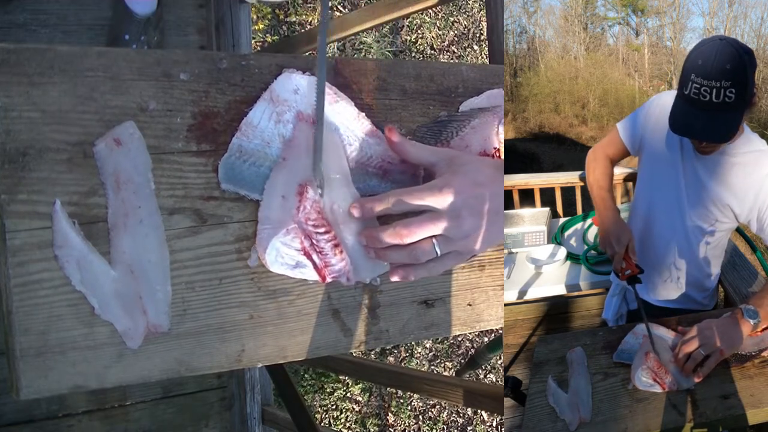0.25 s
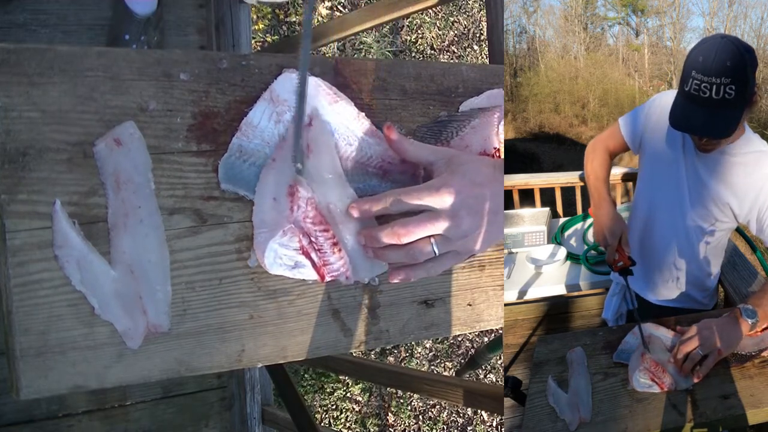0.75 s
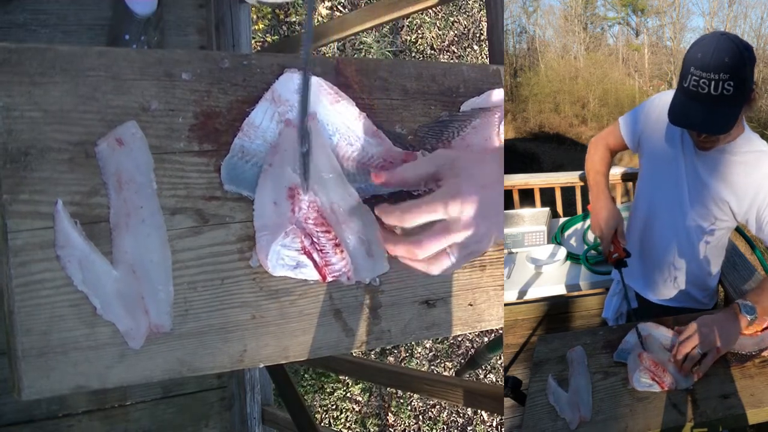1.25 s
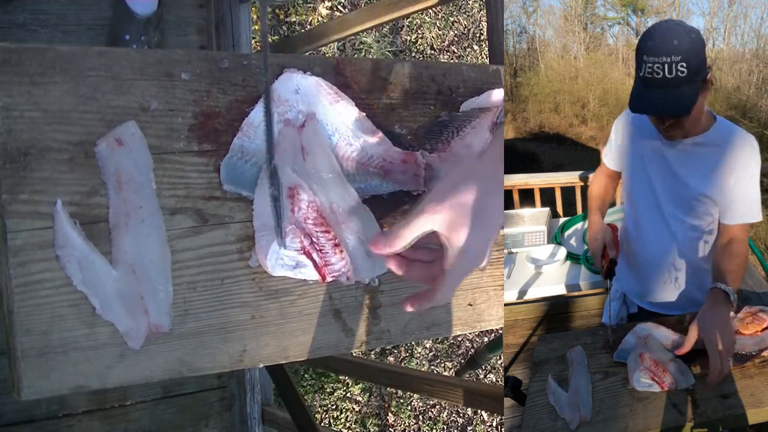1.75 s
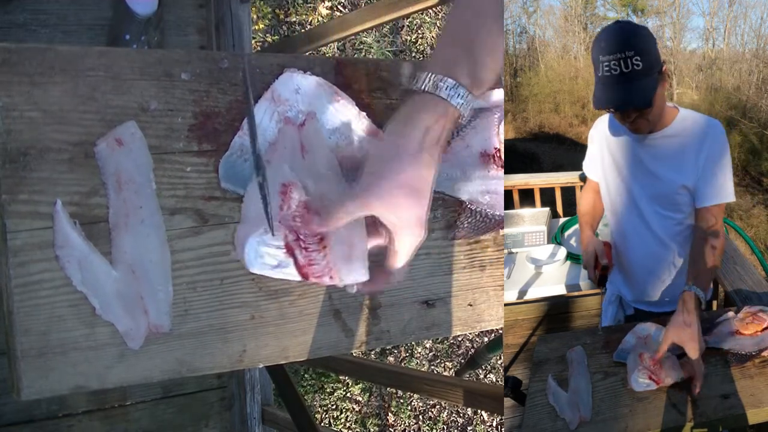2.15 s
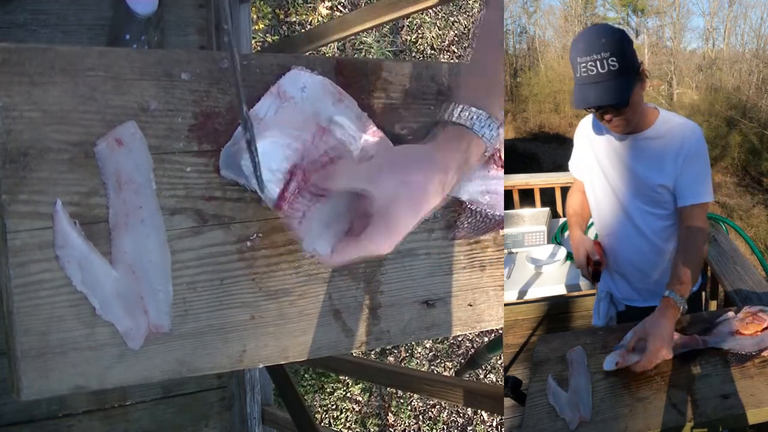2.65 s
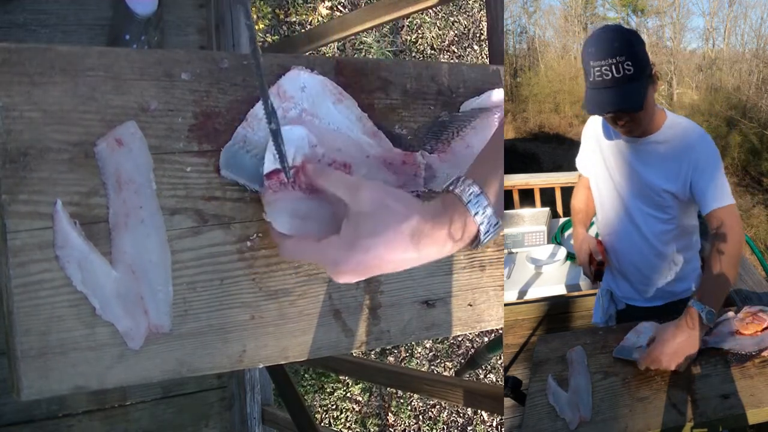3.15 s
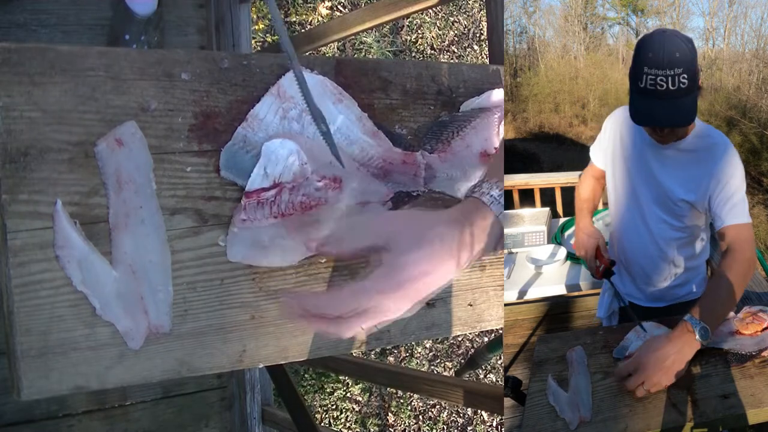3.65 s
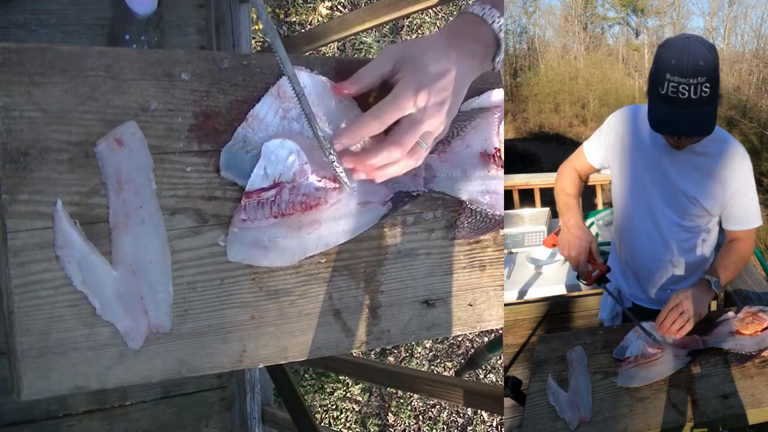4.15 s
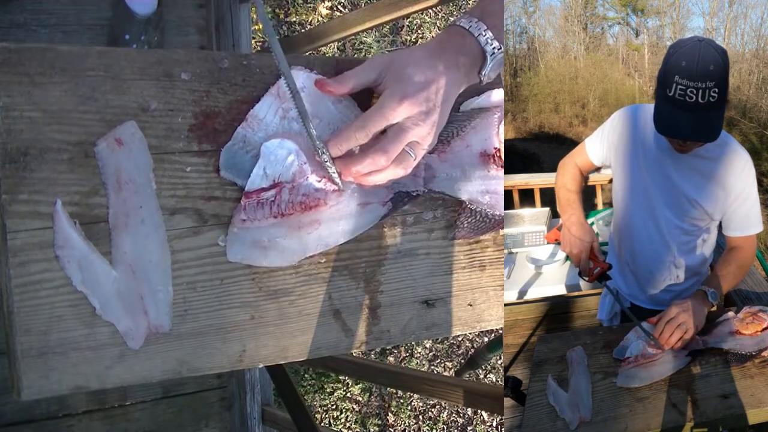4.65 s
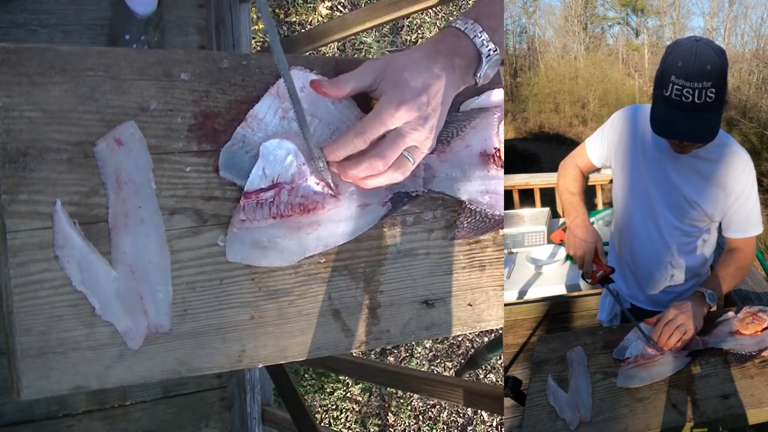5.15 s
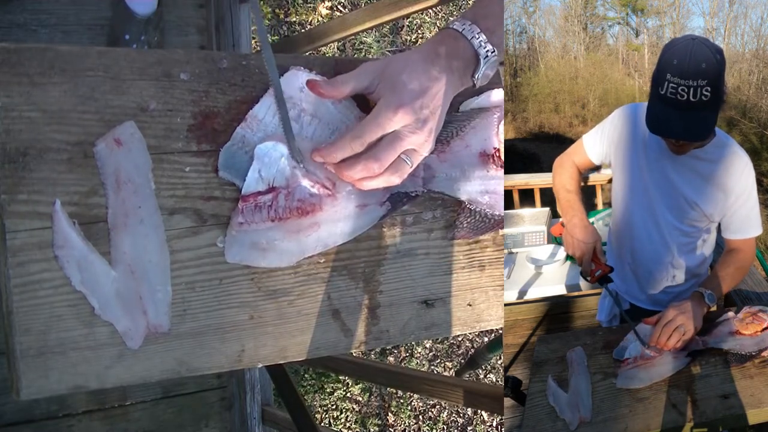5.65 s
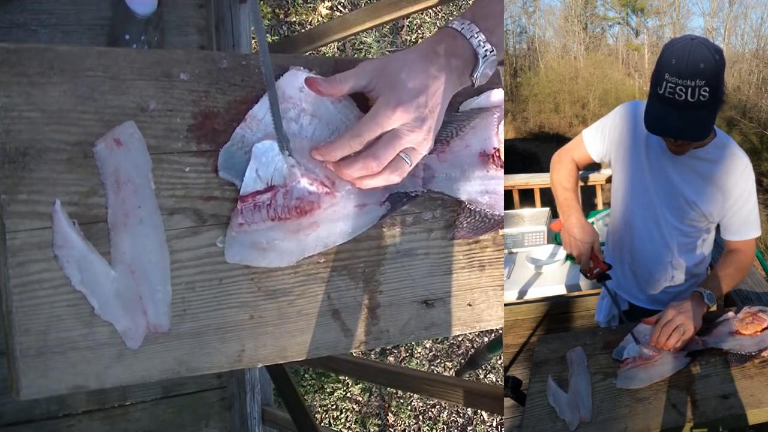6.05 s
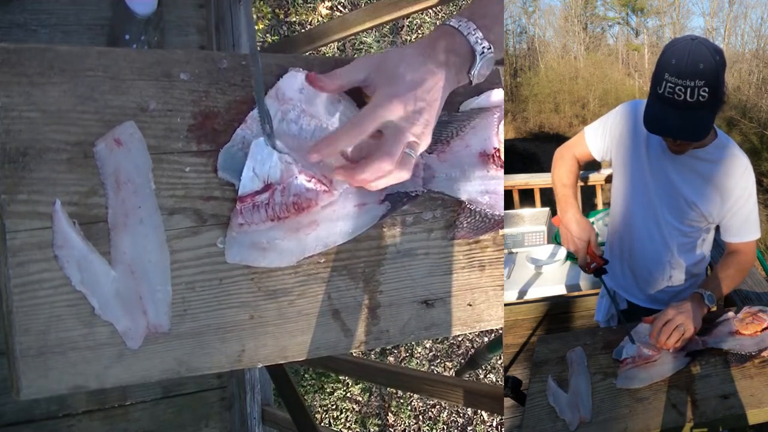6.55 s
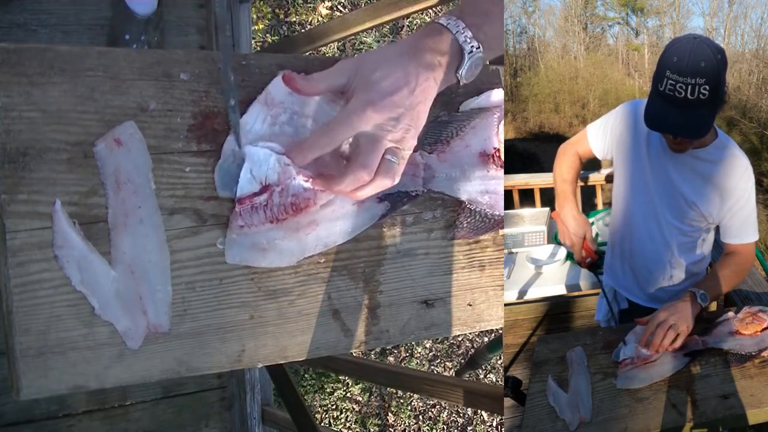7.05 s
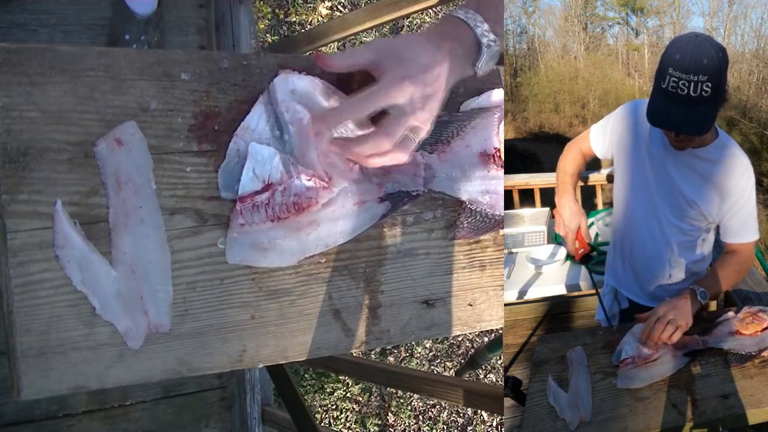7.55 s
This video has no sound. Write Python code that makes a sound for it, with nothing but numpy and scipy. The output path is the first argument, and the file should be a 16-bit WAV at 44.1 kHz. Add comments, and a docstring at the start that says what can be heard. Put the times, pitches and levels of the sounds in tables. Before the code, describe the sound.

A hard, rattling electric buzz with hissing, scraping twin blades works through fish flesh, briefly grating on bone. It slackens into loose metallic clacks that space out and die. Faint wet ticks fill a pause over far traffic and a passing engine's drone. The motor snaps on again, runs in a steadier buzz with small surges of hiss, then catches in coarse crunchy snags. Open air, close microphone, light wind buffets.

```python
"""An electric fillet knife saws through a fish on an outdoor table, coasts to a stop and starts again.
Its drive is a train of impact knocks ringing housing modes; its twin blades are timed noise bursts that
click and scrape, over a sliding hiss. Motor speed and hand pressure set the levels; coasting blades clack.
Behind it: low engine hum as modulated sines, and traffic rush and gusts at the microphone as shaped noise."""
import sys
import numpy as np
from scipy import signal
from scipy.fft import rfft, irfft, next_fast_len
from scipy.io import wavfile
from scipy.ndimage import uniform_filter1d, map_coordinates

SR = 44100
rng = np.random.default_rng(int(sys.argv[2]) if len(sys.argv) > 2 else 0)


def transcribe(u):
    """Save the signal u as a 16-bit wav file named by the first command-line argument.

    u: samples, shape (n,) or (channels, n), limited to [-1, 1]; the rate is SR.
    q: integer samples, one column per channel.
    """
    v = np.clip(np.atleast_2d(u).T, -1, 1)
    q = np.round(v * 32767).astype(np.int16)
    wavfile.write(sys.argv[1], SR, q)


N = 343980

# the motor runs, coasts to a stop and starts again: time_s, stroke_rate_hz
MOTOR_SPEED = [(0, 31.69), (0.48, 31.87), (0.88, 32.244), (1.19, 32.237), (1.95, 19.447), (2.83, 7.177),
               (3.05, 5.272), (3.3, 0.0), (5.125, 0.0), (5.22, 24.047), (5.36, 34.688), (5.7, 32.86),
               (6.65, 32.502), (7.15, 32.783), (7.4, 32.586), (7.52, 34.368), (7.8, 34.528)]
# the motor kicks as it starts: start_s, end_s, gain_db
INRUSH = [(5.16, 5.215, 4.5)]
# the drive runs slack and rattles out of step: start_s, end_s, scatter_strokes
SLACK_SPELLS = [(1.58, 3.3, 0.0075), (5.1, 5.3, 0.049), (7.41, 7.8, .11)]
# how hard the blades are pressed into the fish: time_s, pressure_0_to_1
PRESSURE = [(0, 0.46), (.48, 0.52), (.56, 0.6), (.63, 0.4), (.71, 0.98), (.89, 0.96), (.93, 0.43),
            (1.15, 0.42), (1.3, 0), (1.7, 0.22), (5.25, 0.01), (5.55, 0), (5.8, 0.31), (6.5, 0.33),
            (6.65, 0.63), (7.05, 0.35), (7.3, 0.69), (7.35, 0.7), (7.40, 0.47), (7.8, 0.6)]
# the hand's grip on the housing, which tightens in the second cut: time_s, firmness_0_to_1
FIRMNESS = [(5.7, 0.2), (6.05, 0.68), (6.4, 1), (7.26, 0.93), (7.36, .1), (7.8, 0.2)]

# backlash knocks, relative levels: place_strokes, first_cut_db, second_cut_db
KNOCKS = [(0.97, 0.5, -2), (.06, -9, -10), (.5, -6, -2.5), (.615, -6.5, -7), (.67, -10, -8)]
# housing modes in the first cut, then under a light and a firm hand: mode_hz, width_hz, relative_db
FIRST_GRIP = [(1590, 76, -11.5), (1857, 30, 2.5), (2560, 350, -13), (1920, 160, 4.5)]
LIGHT_GRIP = [(1594, 230, -2), (1840, 140, -1), (2000, 90, -3.5)]
FIRM_GRIP = [(1540, 114, -3.5), (1714, 83, 1), (1893, 115, -2), (2084, 46, -4), (2510, 170, -12.5)]
# modes of the housing's hollow: mode_hz, width_hz, relative_db
HOLLOW = [(567, 71, -2.5), (624, 59, 1)]
# modes of the chattering gears: mode_hz, width_hz, relative_db
GEARS = [(2100, 130, 4.5), (3280, 480, -8.5), (4200, 600, -9)]
# spectrum of the gear whirr: frequency_hz, relative_db
WHIRR = [(100, -21), (200, 1.5), (400, 0.5), (620, 1.5), (900, 2), (1300, 3), (2000, 2.5), (3000, -0.5),
         (4000, -3.5), (5500, -6), (9000, -69)]

# light ticks of the blade mounts: place_strokes, relative_db, decay_ms
TICKS = [(0.1, -2, 0.58), (0.515, 5, 0.5), (.57, 1, 0.34), (0.969, 6, 0.51)]
# spectra of the blades' scrape, hiss, and clicks in either cut: frequency_hz, relative_db
SCRAPE = [(800, -2.5), (2500, -0.5), (3500, 1), (5000, 2.5), (7000, 6.5), (8500, 8.5), (10000, 6.5),
          (12000, 1.5), (14000, -1), (16000, -10)]
HISS = [(2500, -7), (4500, -1), (6500, 4.5), (8000, 5), (10500, 7), (13500, -1.5), (16000, -12)]
FIRST_CLICK = [(800, -13), (2500, -12), (4800, -4.5), (6000, -4), (7200, 4.5), (8800, -4.5), (11000, 0.5),
               (13300, -3), (16000, -12)]
SECOND_CLICK = [(800, -13), (2500, -9), (4800, -4), (6200, -2), (7500, -6), (9600, 0), (11200, 0),
                (13600, 1.5), (16000, -12)]
# each push of the hand squeezes the blades and they hiss more: start_s, end_s, gain_db
PUSHES = [(.24, .52, 1), (1.15, 1.22, 3.5), (1.34, 1.48, 6), (5.91, 6.03, 4), (6.11, 6.25, 5.5),
          (6.32, 6.41, 4.5), (6.5, 6.61, 5), (6.74, 6.77, 1.5), (7.27, 7.46, 3), (7.54, 7.68, 3.5)]
# flexing mode of the steel blade, then teeth on bone: mode_hz, width_hz, relative_db
STEEL = [(5930, 400, 0)]
BONE = [(2530, 210, 0)]
# the steel rings where flesh does not damp it: start_s, end_s, place_strokes, strike_db
RINGS = [(1.773, 1.83, 0.6, -32.5), (5.586, 5.88, .33, -31)]
# the teeth cross the ribs: start_s, end_s, strike_db
RIB_CUTS = [(.59, 0.658, -44), (0.732, 0.9, -36.5), (1.348, 1.55, -41)]
# hard strikes between the coasting blades: time_s, relative_db, resonance_hz
CLACKS = [(1.474, -33, 10900), (1.5179, -35, 11000), (1.5559, -32, 7050), (1.5943, -30, 9200),
          (1.6337, -38, 5780), (1.6741, -31, 9680), (1.7164, -29.5, 4220), (1.7604, -34, 5800),
          (1.8056, -27, 9600), (1.8512, -36, 5900), (1.9001, -31, 10200), (1.9495, -31.5, 9750),
          (2.0022, -31.5, 8230), (2.0564, -34, 8300), (2.1151, -36, 10900), (2.174, -32.5, 9800),
          (2.2378, -38, 8320), (2.2757, -41, 4560), (2.3077, -44, 8840), (2.34, -37.5, 9830),
          (2.3765, -38, 6900), (2.415, -33.5, 10200), (2.4548, -56, 9350), (2.4952, -43, 5740),
          (2.503, -38, 3370), (2.5391, -46, 7250), (2.552, -47, 9800), (2.5958, -39.5, 3110),
          (2.635, -43, 7200), (2.6873, -43, 9900), (2.6984, -41, 3120), (2.724, -50, 7100),
          (2.7427, -41, 7200), (2.8195, -44, 4540), (2.8724, -44, 11100), (2.9692, -48.5, 6790),
          (3.04, -47.5, 5820), (3.0624, -51, 5510), (3.1243, -47, 7340)]
# snags of the teeth: time_s, relative_db, resonance_hz
SNAGS = [(5.1775, -40, 4400), (5.1965, -37, 6700), (5.272, -27, 6600), (5.3045, -30, 7400),
         (5.335, -33, 5100), (7.3994, -20.5, 10800), (7.4548, -23, 11000), (7.5064, -29, 2190),
         (7.5193, -22.5, 3180), (7.5485, -17.5, 11000), (7.58, -29, 8660), (7.621, -21.5, 10000),
         (7.6396, -24, 8370), (7.6648, -25, 10200), (7.6787, -20, 2280), (7.752, -27, 10700)]
# spectrum of the snags: frequency_hz, relative_db
SNAG_COLOUR = [(800, -4), (2200, -2), (4000, 1.5), (5500, 3), (8000, 4), (11000, 2), (16000, -12)]
# small ticks as the knife stops and the fish is turned, then the trigger: time_s, strike_db
HANDLING = [(3.1882, -52), (3.2044, -55), (3.29, -60), (3.4456, -62), (3.7055, -56), (3.7459, -57),
            (4.3864, -60), (5.1275, -49)]
# spectrum of the answer from table and rails: frequency_hz, relative_db
TABLE_ANSWER = [(600, -4.0), (2000, -5.5), (4000, -1.0)]

# spectra of the tyre rush, distant traffic and wind buffeting: frequency_hz, relative_db
TYRES = [(200, -12), (450, -4.5), (750, 1), (1100, -3), (1700, -21), (3000, -48)]
TRAFFIC = [(60, 2), (100, 2.5), (160, 1), (250, -1), (420, -4.5), (560, -2), (850, -2), (1250, -8),
           (1600, -15), (2000, -21), (3200, -37.5), (5000, -41.5), (11000, -42), (16000, -46)]
BUFFET = [(12, 5.5), (20, 8), (40, 5.5), (60, -2), (100, -13), (140, -24), (250, -36), (600, -110)]
# stereo width of the traffic and of the wind: frequency_hz, side_db
TRAFFIC_WIDTH = [(120, -28), (300, -19.5), (1000, -10.5), (2500, -0.5), (6000, 0.5)]
WIND_WIDTH = [(30, -5.5), (150, -15.5)]
# gusts, before each port's share is taken: time_s, half_width_s, rise_db
GUSTS = [(.13, 0.024, 13.5), (.3, 0.058, 11), (.87, 0.11, 13.5), (1.34, 0.072, 3.5), (1.74, 0.25, 9),
         (2.44, 0.059, 9.5), (7.5, 0.037, 12), (7.69, 0.096, 7.5)]
# eddies striking the microphone, before each port's gain: time_s, relative_db, half_width_ms
EDDIES = [(0.338, -21.5, 2.9), (0.851, -22, 8.6), (0.924, -19.5, 7.6), (1.259, -22.5, 9), (1.326, -26, 2.4),
          (2.405, -31, 2.9), (7.44, -26.5, 2.9), (7.523, -14, 9.3), (7.648, -20.5, 2.7)]

# pairs hold (first cut, second cut); a "fall" is in dB per tenfold slowing; "press" is added at full pressure
SECOND_CUT_S, TOP_HZ = 4, 16000
KNOCK_DB, KNOCK_FALL_DB, KNOCK_PRESS_DB, SLACK_KNOCK_DB = -47, 36, 1, -5.5
KNOCK_UNEVEN_DB, FIRM_DB = 1.5, 1.5  # a firm grip knocks louder
WHIRR_DB, WHIRR_FALL_DB, RATTLE_WHIRR_DB = -41.5, 39, 5  # the whirr is louder while the drive rattles
BOOM_DB, BOOM_PRESS_DB, BOOM_WAVER_DB = (-61, -55.5), 3, 1.5
STARTING_SHARE = 0.42  # under starting torque only this share of the drive's fall applies
# coasting below this stroke rate (Hz) the gears stop knocking and chatter
UNLOADED_SPEED_HZ, UNLOADED_DB, CHATTER_DB, CHATTER_FALL_DB = 26, -23, -48.5, 13

CLICK_DB, CLICK_PRESS_DB, CLICK_FALL_DB = (-43.5, -36), 21.5, 18
BACK_CLICK_DB, CLICK_UNEVEN_DB = (4.5, -10), 1.0  # gain of the return stroke's click
SCRAPE_DB, SCRAPE_PRESS_DB, SCRAPE_FALL_DB = (-35, -42.5), 4, 18
HISS_DB, HISS_FALL_DB = (-47, -48.5), 40
IN_FLESH_DB, SUNK_PRESSURE = 3.5, 0.64  # the hiss grows until the blades are sunk in
# coasting below this stroke rate (Hz) the blades part and scrape less
PART_SPEED_HZ, PARTED_SCRAPE_DB, PARTED_HISS_DB = 25.7, -11.5, -4
# turning points (place in the stroke 0-1); pressed blades meet earlier
OUT_PLACE, BACK_PLACE, PRESS_ADVANCE = .335, .77, 0.089
GLIDE_DB, GLIDE_PLACE = 1.5, 0.18  # swell of the hiss, twice a stroke
WAVER_DB, SLOW_WAVER_DB, COLOUR_DRIFT_DB = .9, 2, 1.5
SWELL_S, FADE_S, PUSH_EDGE_S = 0.063, 0.026, 0.0056  # edges of a ring or rasp, then of a push
CLACK_DB, CLACK_MS, SHIVER_DB, SHIVER_MS = -2.5, 2.4, -15, 33
SNAG_DB, SNAG_MS = -13, 13
STRIKE_RISE = 0.084  # rise time of a strike as a share of its decay
LOOSEN_S, RESEAT_S, SEATED_SCATTER = 0.027, .12, .001  # scatter in strokes
UNEVEN_LIMIT = 1.3  # standard deviations by which a contact's strength may stray
TABLE_LAG_MS, TABLE_ANSWER_DB, TABLE_DECAY_MS = 0.072, -9, 10

# a far engine passes: firing rate, when it is nearest, how long it stays near
ENGINE_HZ, NEAREST_S, PASS_S, ENGINE_DB, TYRES_DB = 70.94, 1.74, 0.9, -38, -50
LATE_HUM_HZ, LATE_HUM_S, LATE_HUM_RISE_S, LATE_HUM_DB = 136.6, 6.55, 0.24, -48.5
TRAFFIC_DB, TRAFFIC_EBB_DB_PER_S, BREEZE_DB = -43.5, 0.34, -37.5


def drive():
    """Impact excitation of resonators: backlash rings the housing, friction booms and whirrs, the rotor sings."""
    speed, firm, press = curve(MOTOR_SPEED), curve(FIRMNESS), curve(PRESSURE)
    turns = np.cumsum(speed) / SR
    slow = slowing(33.9) * per_cut(1.0, STARTING_SHARE)
    inrush_db = spells(INRUSH, 0.0097, 0.016)
    second = per_cut(False, True)

    blows = sum(contacts(place, KNOCK_UNEVEN_DB) * amp(per_cut(a, b)) for place, a, b in KNOCKS)
    blows = unit(blows + bursts(blows, decay_ms=26.0) * amp(-45.5))
    knock_db = KNOCK_DB + KNOCK_PRESS_DB * press - KNOCK_FALL_DB * slow + UNLOADED_DB * unloaded()
    # a slack drive knocks more softly
    knock_db = knock_db + SLACK_KNOCK_DB * np.clip(slack() / 0.008, 0, 1)
    blows = blows * amp(knock_db + inrush_db + FIRM_DB * firm)
    knocks = ringing(blows * ~second, FIRST_GRIP)
    knocks = knocks + ringing(blows * second * (1 - firm), LIGHT_GRIP)
    knocks = knocks + ringing(blows * firm, FIRM_GRIP)

    # friction peaks twice a stroke, once in each direction
    load = amp(2.65 * np.cos(4 * np.pi * (turns - .1)))
    whirr_db = WHIRR_DB + per_cut(-0.26, -1.63) - WHIRR_FALL_DB * slow + 0.19 * inrush_db
    whirr_db = whirr_db + RATTLE_WHIRR_DB * np.clip(slack() / 0.28, 0, 1)
    whirr = coloured(airy(scatter_db=-28.0) * load, WHIRR) * amp(whirr_db)

    boom_db = per_cut(*BOOM_DB) + BOOM_PRESS_DB * press - WHIRR_FALL_DB * slow
    boom_db = boom_db + BOOM_WAVER_DB * wobble(9)
    boom = ringing(rng.standard_normal(N) * load, HOLLOW) * amp(boom_db)

    # the rotor tone keeps 8.4 cycles to the stroke
    rotor = np.sin(2 * np.pi * 8.4 * turns + .6 * wobble(16)) * amp(2.5 * wobble(14))
    rotor = rotor * amp(-54.0) * (speed / speed.max()) ** 2
    return (knocks + whirr + boom) * running() * amp([[.6], [-.6]]) + rotor


def chatter():
    """Repeated impact: unloaded gears chatter five times a stroke as the motor runs down."""
    teeth = sum(contacts(k / 5, uneven_db=4) for k in range(5))
    level = amp(CHATTER_DB - CHATTER_FALL_DB * slowing(UNLOADED_SPEED_HZ)) * unloaded() * running()
    return ringing(bursts(teeth * level, decay_ms=2.0), GEARS)


def blades():
    """Impact and sliding friction: blades click at both turning points, scrape after the second, hiss sliding."""
    speed, press = curve(MOTOR_SPEED), curve(PRESSURE)
    pace, slow = speed / speed.max(), slowing(28.4)
    second = per_cut(False, True)
    parted = np.clip((PART_SPEED_HZ - speed) / 2, 0, 1)

    early = PRESS_ADVANCE * press
    outs = contacts(OUT_PLACE - early, CLICK_UNEVEN_DB)
    catches = contacts(BACK_PLACE - early, CLICK_UNEVEN_DB)
    click_db = per_cut(*CLICK_DB) + CLICK_PRESS_DB * press - CLICK_FALL_DB * slow
    meetings = outs + catches * amp(per_cut(*BACK_CLICK_DB))
    click = bursts(meetings * amp(click_db), decay_ms=0.89)
    click = coloured(click * ~second, FIRST_CLICK) + coloured(click * second, SECOND_CLICK)

    scrape_db = per_cut(*SCRAPE_DB) + SCRAPE_PRESS_DB * press ** 2 - SCRAPE_FALL_DB * slow
    scrape_db = scrape_db + PARTED_SCRAPE_DB * parted + WAVER_DB * wobble(8.8)
    scrape = bursts(catches * amp(scrape_db + 12.5 - 13.7 * pace), decay_ms=3.3)

    def during(start, end, db):
        """Gain envelope of one spell of contact."""
        return spells([(start, end, amp(db))], SWELL_S, FADE_S)

    taps = sum(contacts(place, CLICK_UNEVEN_DB) * during(start, end, db) for start, end, place, db in RINGS)
    ring = ringing(bursts(taps, decay_ms=0.77), STEEL)
    rib_blows = (catches + .5 * outs) * sum(during(*row) for row in RIB_CUTS)
    rasp = ringing(bursts(rib_blows, decay_ms=2.4), BONE)

    hiss_db = per_cut(*HISS_DB) + IN_FLESH_DB * np.clip(press / SUNK_PRESSURE, 0, 1)
    hiss_db = hiss_db - HISS_FALL_DB * slow * per_cut(0.85, 0.59)
    hiss_db = hiss_db + spells(PUSHES, PUSH_EDGE_S, PUSH_EDGE_S) + PARTED_HISS_DB * parted * ~second
    # the slower the blades slide, the more unevenly they rub
    hiss_db = hiss_db + (WAVER_DB + SLOW_WAVER_DB * (1 - pace)) * wobble(22)
    ticks = sum(bursts(contacts(place, uneven_db=5.5) * amp(db + 7.0), ms) for place, db, ms in TICKS)
    # the hiss swells just before each turning point and dips after it
    glide_db = GLIDE_DB * np.cos(4 * np.pi * (np.cumsum(speed) / SR - GLIDE_PLACE))
    slide = airy(scatter_db=8.0) * amp(glide_db + 4.0 * wobble(400))
    hiss = coloured((ticks * pace * (1 - parted) + slide) * amp(hiss_db) * np.sqrt(running()), HISS)

    rubbing = shifting(hiss + coloured(scrape, SCRAPE) * running() ** 3, COLOUR_DRIFT_DB)
    return (rubbing + (click + ring + rasp) * running() ** 3) * amp([[-.5], [.5]])


def clacks():
    """Impact and modal decay: coasting blades snap together and shiver, at a resonance given for each blow."""
    snap = strikes(CLACKS, CLACK_MS, width_hz=910, ring_db=4.5)
    shiver = strikes(CLACKS, SHIVER_MS, width_hz=560, ring_db=7)
    return amp(CLACK_DB) * coloured(snap + amp(SHIVER_DB) * shiver, SCRAPE)


def snags():
    """Catch and release: teeth snag and rasp as the blades bite into the cut and are drawn out of it."""
    return amp(SNAG_DB) * coloured(strikes(SNAGS, SNAG_MS, width_hz=950, ring_db=4.5), SNAG_COLOUR)


def handling():
    """Light impact with friction: ticks of knife, wet fish and trigger, each with a faint rustle after it."""
    s, db = np.transpose(HANDLING)
    taps = np.bincount((s * SR).astype(int), amp(db), N)
    rustle = amp(-16) * bursts(taps, decay_ms=48.0)
    return coloured(bursts(taps, decay_ms=3.5) + rustle, FIRST_CLICK)


def over_table(x):
    """Arrival delay and reflection: the right port leads; table and rails answer weakly, mostly in the treble."""
    ports = np.array([[-1], [1]])
    direct = filtered(x, lambda hz: np.exp(1j * np.pi * hz * TABLE_LAG_MS / 1000 * ports))
    t_ms = np.arange(SR // 20) * 1000 / SR
    tail = rng.standard_normal((2, len(t_ms))) * np.exp(-t_ms / TABLE_DECAY_MS)
    answer = signal.fftconvolve(x, tail / np.linalg.norm(tail[0]), axes=1)[:, :N]
    return direct + amp(TABLE_ANSWER_DB) * coloured(answer, TABLE_ANSWER)


def wind():
    """Turbulent pressure on the microphone: a breeze, its gusts and single eddies buffet the left port most."""
    t = np.arange(N) / SR
    gust_db = sum(db * np.exp(-((t - s) / width) ** 2 / 2) for s, width, db in GUSTS)
    flutter_db = 1.6 * wobble(9)
    buffet = spread(BUFFET, WIND_WIDTH) * amp(BREEZE_DB + flutter_db)
    # the right port is sheltered and feels only part of each gust
    buffet = buffet * amp(np.array([1.0 + gust_db, -1.5 + .5 * gust_db]))
    eddies = np.zeros(N)
    for s, db, half_width_ms in EDDIES:
        square = ((t - s) * 1000 / half_width_ms) ** 2
        eddies -= amp(db) * np.exp(-square / 2) * (1 - square / 2)
    return buffet + eddies * amp([[4], [-10]])


def distance():
    """Broadband and periodic sources far off: traffic, a passing engine with its tyres, and two faint hums."""
    t = np.arange(N) / SR
    traffic = spread(TRAFFIC, TRAFFIC_WIDTH)
    traffic = traffic * amp(TRAFFIC_DB - TRAFFIC_EBB_DB_PER_S * t + 0.44 * wobble(5.13))
    # sound pressure falls as one over the distance
    nearness = 1 / np.hypot(1, (t - NEAREST_S) / PASS_S)
    engine = np.sin(2 * np.pi * ENGINE_HZ * t + 1.45 * wobble(7))
    engine = nearness * amp(ENGINE_DB + 1.9 * wobble(8.4)) * engine
    tyres = nearness ** 2 * amp(TYRES_DB) * coloured(rng.standard_normal(N), TYRES)
    late = np.sin(2 * np.pi * LATE_HUM_HZ * t + 0.17 * wobble(4.3))
    late = amp(LATE_HUM_DB) * spells([(LATE_HUM_S, t[-1], 1)], LATE_HUM_RISE_S, 1) * late
    drone = amp(-58.5 + 2.1 * wobble(12)) * np.sin(2 * np.pi * 554 * t + 2.57 * wobble(24))
    return traffic + engine + tyres + late + drone


def running():
    """Onset of motion: 0 at rest, rising with speed to 1 at six strokes a second."""
    return np.clip(curve(MOTOR_SPEED) / 6, 0, 1)


def slowing(full_speed_hz):
    """Logarithmic speed scale: tenfold steps by which the motor is slower than full_speed_hz."""
    return -np.log10(np.clip(curve(MOTOR_SPEED) / full_speed_hz, 1e-3, 1))


def unloaded():
    """Torque release: rises from 0 to 0.9 as the motor of the first cut coasts and stops pushing the gears."""
    return per_cut(0.9, 0) * np.clip(UNLOADED_SPEED_HZ - curve(MOTOR_SPEED), 0, 1)


def slack():
    """Mechanical play: timing scatter of the contacts, in strokes."""
    return SEATED_SCATTER + spells(SLACK_SPELLS, LOOSEN_S, RESEAT_S)


def per_cut(first, second):
    """Change of grip: one value for each of the two cuts."""
    return np.where(np.arange(N) > SECOND_CUT_S * SR, second, first)


def contacts(place, uneven_db):
    """Cyclic impact: one impulse each time the crank passes a place in its stroke; the place may drift."""
    turns = np.cumsum(curve(MOTOR_SPEED)) / SR
    strokes = np.arange(int(turns[-1]) + 1)
    due = strokes + np.interp(strokes + .5, turns, place + np.zeros(N))
    chance = rng.standard_normal((len(due), 2))
    scattered = due + np.interp(due, turns, slack()) * chance[:, 0]
    at = np.searchsorted(turns, scattered)
    strength = amp(uneven_db * np.clip(chance[:, 1], -UNEVEN_LIMIT, UNEVEN_LIMIT))
    return np.bincount(at, strength, N + 1)[:N]


def bursts(impulses, decay_ms):
    """Exponential decay: each impulse sets off a dying puff of noise."""
    envelope = signal.lfilter([1], [1, -np.exp(-1000 / (SR * decay_ms))], impulses)
    return uniform_filter1d(envelope, size=24) * airy(scatter_db=-1.5)


def strikes(rows, decay_ms, width_hz, ring_db):
    """Struck resonance: each row is a dying puff of noise that favours one mode of the blade."""
    out = np.zeros((2, N + SR))
    t_ms = np.arange(SR // 4) * 1000 / SR
    envelope = np.exp(-t_ms / decay_ms) * (1 - np.exp(-t_ms / (STRIKE_RISE * decay_ms)))
    for s, db, hz in rows:
        noise = rng.standard_normal((3, len(t_ms)))
        puff = unit(noise[0] + noise[1:]) * envelope
        ring = signal.lfilter(*signal.iirpeak(hz, hz / width_hz, fs=SR), puff)
        out[:, int(s * SR):][:, :len(t_ms)] += amp(db) * (puff + amp(ring_db) * ring)
    return out[:, :N]


def shifting(x, patchy_db):
    """Spectral fluctuation: the colour of x drifts in patches about 700 Hz wide and .1 s long."""
    z = signal.stft(x, nperseg=512)[2]
    field = uniform_filter1d(rng.standard_normal(z.shape[1:]), size=8, axis=0)
    field = uniform_filter1d(field, size=18, axis=1)
    return signal.istft(z * unit(amp(patchy_db * unit(field))), nperseg=512)[1][:, :N]


def airy(scatter_db):
    """Partial coherence: white noise on two ports, partly shared and partly each port's own."""
    shared, left, right = rng.standard_normal((3, N))
    return unit(shared + amp(scatter_db) * np.array([left, right]))


def spread(spectrum, width):
    """Coherence by frequency: stereo noise from a shared middle and an opposed side."""
    f, side_db = np.transpose(width)
    mid, side = coloured(rng.standard_normal((2, N)), spectrum)
    side = filtered(side, lambda hz: amp(np.interp(np.log(hz + 1), np.log(f), side_db)))
    return np.array([mid + side, mid - side])


def spells(rows, rise_s, fall_s):
    """Exponential onset and release: each (start, end, size) row swells, holds and dies away."""
    t = np.arange(N) / SR
    total = np.zeros(N)
    for start, end, size in rows:
        before, after = np.maximum(start - t, 0), np.maximum(t - end, 0)
        total += size * np.exp(-before / rise_s - after / fall_s)
    return total


def curve(rows):
    """Linear interpolation: one value per sample from (time, value) rows."""
    s, values = np.transpose(rows)
    return np.interp(np.arange(N) / SR, s, values)


def wobble(rate):
    """Random modulation: a smooth curve through rate random knots a second."""
    knots = rng.standard_normal(int(N * rate / SR) + 4)
    return map_coordinates(knots, [np.arange(N) * rate / SR])


def ringing(x, modes):
    """Modal superposition: x drives resonances of alternating sign, keeping the power of white sound."""
    def response(f):
        """Sum of damped oscillators."""
        total = 0
        for k, (centre, width, db) in enumerate(modes):
            damping = 1j * f * width
            total = total + (-1) ** k * amp(db) * damping / (centre * centre - f * f + damping)
        # the complex values are scaled through their real and imaginary parts
        return unit(total.view(float)).view(complex)
    return filtered(x, response)


def coloured(x, spectrum):
    """Spectral shaping: white sound takes on a spectrum and keeps its power."""
    f, db = np.transpose(spectrum)
    return filtered(x, lambda hz: unit(amp(np.interp(np.log(hz + 1), np.log(f), db))))


def filtered(x, response):
    """Linear filtering: the spectrum of x times a complex response of frequency."""
    size = next_fast_len(N + SR // 4)
    return irfft(rfft(x, size) * response(np.fft.rfftfreq(size, 1 / SR)), size)[..., :N]


def unit(x):
    """Normalisation to rms 1."""
    return x / np.sqrt(np.mean(x ** 2) + 1e-20)


def amp(db):
    """Logarithmic level: decibels to gain."""
    return 10 ** (np.asarray(db) / 20)


def scene():
    """Superposition: the knife over its table, with the wind and the distance."""
    knife = drive() + chatter() + blades() + clacks() + snags() + handling()
    return over_table(knife) + wind() + distance()


def record(dry):
    """Band limiting: nothing from TOP_HZ upward is kept."""
    return filtered(dry, lambda hz: hz < TOP_HZ)


dry = scene()
out = record(dry)
transcribe(out)
```